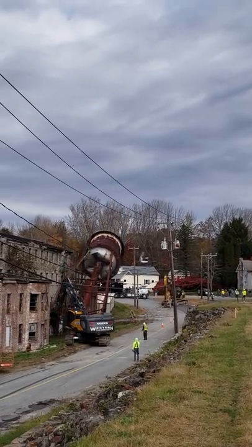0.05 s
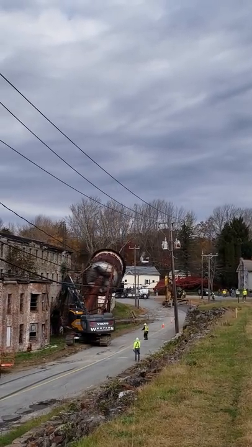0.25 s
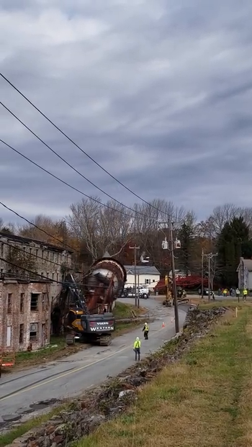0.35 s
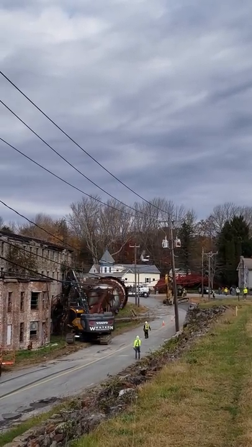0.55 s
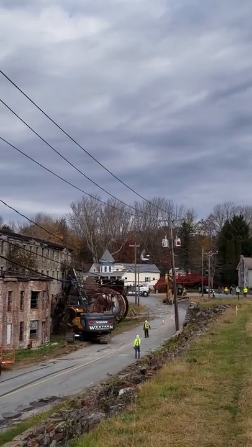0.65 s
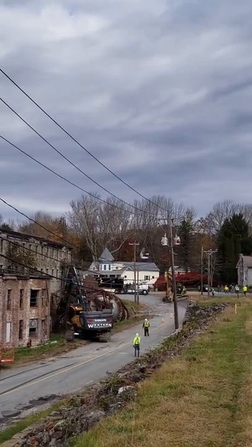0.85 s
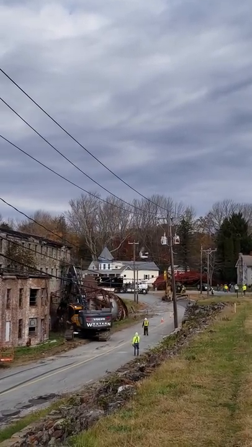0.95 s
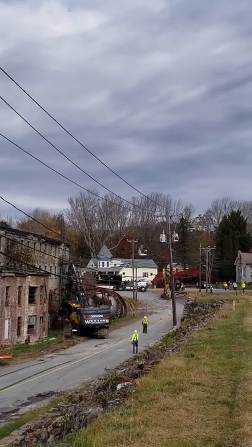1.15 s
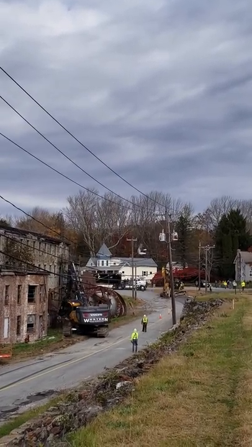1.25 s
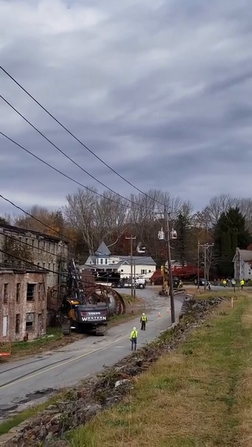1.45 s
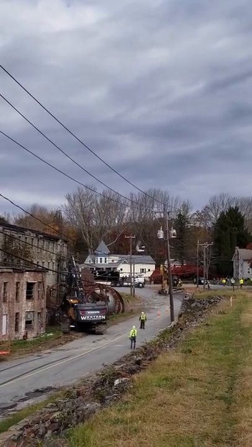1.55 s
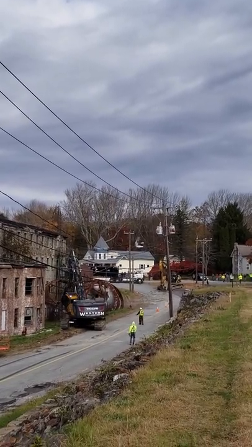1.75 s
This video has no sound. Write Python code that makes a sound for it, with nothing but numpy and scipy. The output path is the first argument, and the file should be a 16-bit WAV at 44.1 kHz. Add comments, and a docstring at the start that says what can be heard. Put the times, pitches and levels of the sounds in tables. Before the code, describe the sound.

A steel tower collapses outdoors, some way off. From about 0.3 seconds its legs buckle with thuds, clangs and crunching, followed by sharp snaps, a brief groan and a faint high sizzle. At 1 second the hollow tank lands with the loudest boom, its plates crumpling and ringing. A smaller thud comes near 1.5 seconds as the wreck settles, echoing briefly off walls over steady low wind and machinery rumble.

```python
"""Water tower collapse

A rusty steel tower topples some way off: its legs buckle and tear, then the tank lands and caves in.
The hollow shell booms, plates crumple and ring, girders clang and groan, rivets and debris snap.
A thin sizzle comes in spurts. The road and nearby walls reflect the collapse.
Demolition machinery and wind rumble underneath."""
import sys
import numpy as np
from scipy import signal
from scipy.fft import rfft, irfft, next_fast_len
from scipy.io import wavfile
from scipy.ndimage import uniform_filter1d, minimum_filter1d

SR = 44100
rng = np.random.default_rng(int(sys.argv[2]) if len(sys.argv) > 2 else 0)


def unload_wav(signal):
    """Save mono or channel-first audio to the path in sys.argv[1] as 16-bit WAV at rate SR, clipped to [-1, 1]."""
    wavfile.write(
        sys.argv[1],
        SR,
        np.round(np.clip(np.atleast_2d(signal).T, -1, 1) * 32767).astype(np.int16),
    )


N = 79380

# source spectra: freq_hz, density_db
RUMBLE_SPECTRUM = [(20, -17), (45, -17.5), (70, 3), (140, 2), (260, -3.5), (400, -19.5), (700, -11),
                   (2000, -25), (6000, -63), (9000, -68), (13000, -75), (16000, -86)]
BOOM_SPECTRUM = [(20, -21), (35, -11), (50, -14), (68, 1.5), (100, 2), (130, 0), (175, -4), (280, -7),
                 (380, -22), (900, -93)]
PLATE_SPECTRUM = [(200, -4), (410, -6.5), (520, -1), (720, 0), (1000, -5), (1800, -7.5), (2500, -16.5),
                  (3500, -25), (8000, -99)]
TEAR_SPECTRUM = [(900, -42), (2500, 0.5), (3600, -1.5), (6300, -13), (7200, -21.5), (8500, -30),
                 (13500, -46.5), (15500, -59)]
CRUNCH_SPECTRUM = [(200, -24), (400, -6.5), (700, 5), (1800, 3), (5500, -10), (8500, -53), (14000, -71)]
SNAP_SPECTRUM = [(500, 24.5), (6300, -7), (8500, -26), (11000, -26.5), (15000, -49)]
SIZZLE_SPECTRUM = [(9000, -23), (11400, -3), (11650, 1.5), (11950, -2), (13000, -5), (14200, -10),
                   (16000, -26)]
# long grinding, legs buckling, tank landing, wreck settling:
# start_s, hold_s, rise_s, fall_s, boom_db, plate_db, tear_db, boom_low_cut_hz
COLLAPSE_STAGES = [(0.268, 0.79, 3.56, 3.97, -27.5, -24, -37, 70),
                   (0.329, 0.16, 0.47, 0.73, -17.5, -20, -31.5, 103),
                   (1.015, 0.11, 0.19, 0.36, -9, -19, -28, 49.3),
                   (1.195, .06, 0.19, 0.7, -17, -38, -43.5, 70)]
# heavy blows on the shell: start_s, force_db
SHELL_BLOWS = [(0.031, -23.5), (.305, -20), (0.364, -14), (0.397, -11.5), (0.433, -10.5), (0.504, -15),
               (1.002, -10.5), (1.034, -7), (1.071, -4), (1.103, -6.5), (1.188, -13.5), (1.245, -13),
               (1.53, -13), (1.71, -22.5)]
# shell modes: freq_hz, relative_db, t60_s
SHELL_MODES = [(73.8, -8, 0.11), (106, -1, 0.12), (130.5, -2, 0.25), (160.4, -2, 0.13),
               (247.2, -0.5, 0.095), (302.3, -10, 0.054)]
# plates giving way: start_s, relative_db, t60_s
PLATE_CRUNCHES = [(.142, -38, 0.06), (.192, -26, 0.2), (0.305, -21, 0.13), (0.376, -18.5, 0.12),
                  (0.481, -20.5, 0.078), (0.957, -24, 0.092), (1.001, -11.5, 0.053), (1.018, -14.5, 0.17),
                  (1.055, -22, 0.13), (1.122, -19, 0.25)]
# rivets and debris snapping: start_s, relative_db, pitch_hz, t60_s
RIVET_SNAPS = [(0.192, -32, 2500, 0.06), (0.297, -32.5, 5600, 0.085), (0.309, -25.5, 3080, 0.048),
               (0.376, -31.5, 6800, 0.13), (0.417, -26.5, 3300, 0.051), (0.482, -26, 4150, 0.096),
               (0.642, -30, 4440, 0.045), (0.681, -24, 3520, 0.025), (0.737, -33.5, 5800, 0.041),
               (0.814, -26, 3200, 0.046), (1.061, -26.5, 4430, 0.059), (1.099, -19, 5600, 0.015),
               (1.124, -30, 5500, 0.067), (1.654, -53, 6470, 0.24)]
# girder collisions: start_s, level_db, pitch_hz
GIRDER_CLANGS = [(.31, -14.5, 900), (0.327, -14, 644), (0.363, -17, 606), (0.405, -15, 633),
                 (0.469, -17, 700), (1.022, -11.5, 730), (1.122, -13.5, 580)]
# high sizzle: start_s, level_db
SIZZLE_SPURTS = [(.37, -56), (.476, -51), (.605, -56.5), (0.721, -60), (.82, -62), (1.0, -64)]
# bending steel: start_s, length_s, from_hz, to_hz, half_width_hz, level_db
STEEL_GROANS = [(0.647, .16, 101, 89.6, 14, -27.5), (.955, 0.0491, 830, 727.8, 180, -23.5),
                (1.06, .12, 679.2, 499.8, 110, -24)]
# mode clusters of the tank's plates: centre_hz, level_db, t60_s
PLATE_MODES = [(304, -26, 2.66), (1795, -20.5, 0.72), (2390, -26.5, 2.08)]
# road reflection: freq_hz, gain_re_direct
ROAD_REFLECTION = [(700, 0.0033), (1800, 0.065), (3500, 0.41), (8000, .1)]
# wall reverberation: freq_hz, t60_s
WALL_DECAY = [(100, 1), (1000, 1), (8000, 0.52)]
# left-right likeness, low and high range: freq_hz, correlation
BASS_CORRELATION = [(150, .995), (300, .96)]
TREBLE_CORRELATION = [(700, 0.83), (1400, 0.51), (2800, 0.25), (9000, 0.17)]
# stereo balance: freq_hz, left_minus_right_db
STEREO_BALANCE = [(60, 0.7), (160, -2.3), (300, -1.5), (510, 4.5), (870, -3), (1490, -3), (2540, 2),
                  (4330, 2.5), (7400, -2)]


def amp(db):
    """Decibels to gain."""
    return 10 ** (np.asarray(db) / 20)


def unit(x):
    """Scale to rms 1."""
    return x / np.sqrt(np.mean(x ** 2) + 1e-20)


def along(points, hz):
    """Interpolate (freq_hz, value) points on a log axis."""
    freqs_hz, values = np.transpose(points)
    return np.interp(np.log(hz + 1), np.log(freqs_hz + 1), values)


def filtered(x, response):
    """Apply a frequency response."""
    size = next_fast_len(N + SR // 2)
    return irfft(rfft(x, size) * response(np.fft.rfftfreq(size, 1 / SR)), size)[..., :N]


def spread(pair, spectrum):
    """Two independent signals to shaped stereo of rms 1: narrow bass, wide treble."""
    def response(hz):
        correlation = along(BASS_CORRELATION + TREBLE_CORRELATION, hz)
        angle = np.arccos(np.clip(correlation, -1, 1)) / 2
        return amp(along(spectrum, hz)) * [np.cos(angle), np.sin(angle)]
    mid, side = filtered(pair, response)
    return unit(np.array([mid + side, mid - side]))


def noise():
    """Two independent white noises."""
    return rng.standard_normal((2, N))


def grains(per_s, scatter_db, wash):
    """Tiny fractures of uneven size at random times, on a wash of smaller ones."""
    onsets = rng.random(N) < per_s / SR
    sizes = amp(scatter_db * np.clip(rng.standard_normal(N), -2, 2))
    return unit(onsets * sizes * noise()) + wash * noise()


def steadied(x, window_s):
    """Even out slow chance swells."""
    power = uniform_filter1d(np.mean(x ** 2, axis=0), int(window_s * SR))
    return x / np.sqrt(abs(power) + 1e-9)


def since(start_s):
    """Seconds since start_s, zero before."""
    return np.maximum(np.arange(N) / SR - start_s, 0)


def strike(start_s, attack_s, t60_s):
    """Envelope: quick rise, exponential fall."""
    t = since(start_s)
    return (1 - np.exp(-t / attack_s)) * np.exp(-np.log(1000) * t / t60_s)


def swell(start_s, end_s, rise_s, fall_s):
    """Envelope: up 60 dB in rise_s, flat from start_s to end_s, down 60 dB in fall_s."""
    until_s = np.maximum(start_s - np.arange(N) / SR, 0)
    return amp(-60 * (until_s / rise_s + since(end_s) / fall_s))


def rumble(level_db=-27.5):
    """Machinery and wind: steady low noise."""
    return amp(level_db) * spread(noise(), RUMBLE_SPECTRUM)


def collapse(boom_lag_s=0.025):
    """Each stage drives the hollow shell's boom, a mid roar of bending plates and brighter tearing."""
    out = np.zeros((2, N))
    for start_s, hold_s, rise_s, fall_s, boom_db, plate_db, tear_db, cut_hz in COLLAPSE_STAGES:
        low_cut = lambda hz: (hz / cut_hz) ** 2 / np.hypot(1, (hz / cut_hz) ** 2)
        boom = steadied(filtered(spread(noise(), BOOM_SPECTRUM), low_cut), window_s=0.037)
        plates = spread(grains(per_s=2500, scatter_db=2.5, wash=1.27), PLATE_SPECTRUM)
        tearing = spread(grains(per_s=1500, scatter_db=6.5, wash=2.4), TEAR_SPECTRUM)
        fractures = amp(plate_db) * steadied(plates, window_s=0.048) + amp(tear_db) * tearing
        end_s = start_s + hold_s
        out += swell(start_s, end_s, rise_s, fall_s) * fractures
        out += swell(start_s + boom_lag_s, end_s, rise_s, fall_s) * amp(boom_db) * boom
    return out


def thuds(gain_db=-3, attack_s=0.0012, detune=0.018, tilt_db_per_octave_per_db=0.69):
    """Blows push the shell in or out and ring it, retuned as it deforms; heavier ones sound deeper."""
    out = np.zeros(N)
    mean_force_db = np.mean([db for _, db in SHELL_BLOWS])
    middle_hz = np.median([hz for hz, _, _ in SHELL_MODES])
    for start_s, force_db in SHELL_BLOWS:
        tilt_db_per_octave = tilt_db_per_octave_per_db * (force_db - mean_force_db)
        for hz, mode_db, t60_s in SHELL_MODES:
            tune, push = rng.standard_normal(2)
            tilt_db = tilt_db_per_octave * np.log2(middle_hz / hz)
            swing = np.sign(push) * np.sin(2 * np.pi * hz * (1 + detune * tune) * since(start_s))
            out += amp(force_db + mode_db + tilt_db) * strike(start_s, attack_s, t60_s) * swing
    return amp(gain_db) * np.array([out, out])


def crunches(gain_db=-2, attack_s=0.0014):
    """Plates give way in bursts of fractures."""
    envelope = sum(amp(db) * strike(start_s, attack_s, t60_s) for start_s, db, t60_s in PLATE_CRUNCHES)
    fractures = spread(grains(per_s=3100, scatter_db=-4, wash=0.99), CRUNCH_SPECTRUM)
    return amp(gain_db) * envelope * fractures


def snaps(gain_db=7.5, attack_s=0.001, q=1.56):
    """Rivets and debris crack, each in one broad, bright resonance."""
    out = np.zeros((2, N))
    crack = spread(noise(), SNAP_SPECTRUM)
    for start_s, db, pitch_hz, t60_s in RIVET_SNAPS:
        resonance = lambda hz: 1j * hz / (pitch_hz ** 2 - hz ** 2 + 1j * hz * pitch_hz / q)
        out += amp(db + gain_db) * strike(start_s, attack_s, t60_s) * unit(filtered(crack, resonance))
    return out


def clangs(attack_s=0.0014, t60_s=0.096, half_width_octaves=0.7):
    """Girders collide, each in its own dense set of short-lived modes."""
    out = np.zeros((2, N))
    for start_s, level_db, pitch_hz in GIRDER_CLANGS:
        band = lambda hz: 1 / (1 + (np.log2((hz + 1) / pitch_hz) / half_width_octaves) ** 4)
        modes = steadied(filtered(spread(noise(), PLATE_SPECTRUM), band), window_s=0.021)
        out += amp(level_db) * strike(start_s, attack_s, t60_s) * modes
    return out


def sizzle(attack_s=0.016, t60_s=0.44):
    """Spurts of thin, very high noise."""
    envelope = sum(amp(db) * strike(start_s, attack_s, t60_s) for start_s, db in SIZZLE_SPURTS)
    return envelope * spread(noise(), SIZZLE_SPECTRUM)


def groans():
    """A fuzzy resonance sinks as the steel folds."""
    out = np.zeros(N)
    for start_s, length_s, from_hz, to_hz, half_width_hz, level_db in STEEL_GROANS:
        end_s = start_s + length_s
        pitch_hz = np.interp(np.arange(N) / SR, [start_s, end_s], [from_hz, to_hz])
        phase = 2 * np.pi * np.cumsum(pitch_hz) / SR
        low_pass = lambda hz: 1 / (1 + (hz / half_width_hz) ** 2)
        sway = steadied(filtered(noise(), low_pass), window_s=0.045)
        tone = sway[0] * np.cos(phase) + sway[1] * np.sin(phase)
        out += amp(level_db) * swell(start_s, end_s, rise_s=0.12, fall_s=0.19) * tone
    return out


def ringing(landing_s=1, attack_s=0.013, half_width_ratio=0.091):
    """The landing leaves the tank's plates ringing in clusters of modes."""
    out = np.zeros((2, N))
    for centre_hz, level_db, t60_s in PLATE_MODES:
        band = lambda hz: 1 / (1 + ((hz / centre_hz - 1) / half_width_ratio) ** 2)
        cluster = steadied(filtered(spread(noise(), PLATE_SPECTRUM), band), window_s=0.26)
        out += amp(level_db) * strike(landing_s, attack_s, t60_s) * cluster
    return out


def road(x, delay_s=0.00222):
    """A second path off the ground ripples the treble."""
    def comb(hz):
        bounce = along(ROAD_REFLECTION, hz)
        return (1 + bounce * np.exp(-2j * np.pi * hz * delay_s)) / np.hypot(1, bounce)
    return filtered(x, comb)


def walls(x, gain_db=-8.5, delay_s=0.025):
    """Diffuse echo off buildings and trees; treble dies first."""
    white = spread(noise(), spectrum=[(20, 0)])[:, :SR // 2]
    hz, t, bins = signal.stft(white, SR, nperseg=256)
    decay = np.exp(-np.log(1000) * t / along(WALL_DECAY, hz)[:, None])
    _, tail = signal.istft(bins * decay, SR, nperseg=256)
    tail = np.pad(tail / np.linalg.norm(tail[0]), ((0, 0), (int(delay_s * SR), 0)))
    return amp(gain_db) * signal.fftconvolve(x, tail, axes=1)[:, :N]


def scene():
    """The falling tower and its echoes over the rumble."""
    hits = thuds() + clangs() + crunches() + snaps() + groans()
    tower = road(hits + walls(hits) + collapse()) + ringing() + sizzle()
    balance = lambda hz: amp(along(STEREO_BALANCE, hz) * np.array([[0.5], [-0.5]]))
    return filtered(tower + rumble(), balance)


def record(dry):
    """Peak limiter, then brick-wall low-pass."""
    ceiling, hold_s, cutoff_hz = 0.98, 0.002, 15800
    hold_samples = int(hold_s * SR)
    needed_gain = ceiling / np.maximum(abs(dry).max(axis=0), ceiling)
    gain = uniform_filter1d(minimum_filter1d(needed_gain, 2 * hold_samples), hold_samples)
    return filtered(dry * gain, lambda hz: hz < cutoff_hz)


dry = scene()
out = record(dry)
unload_wav(out)
```